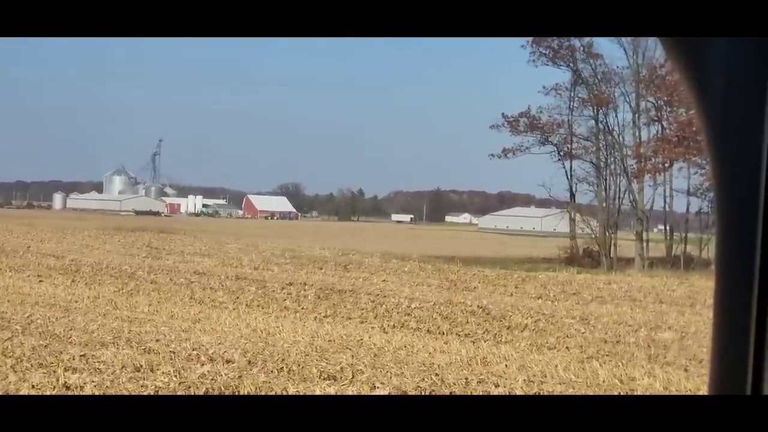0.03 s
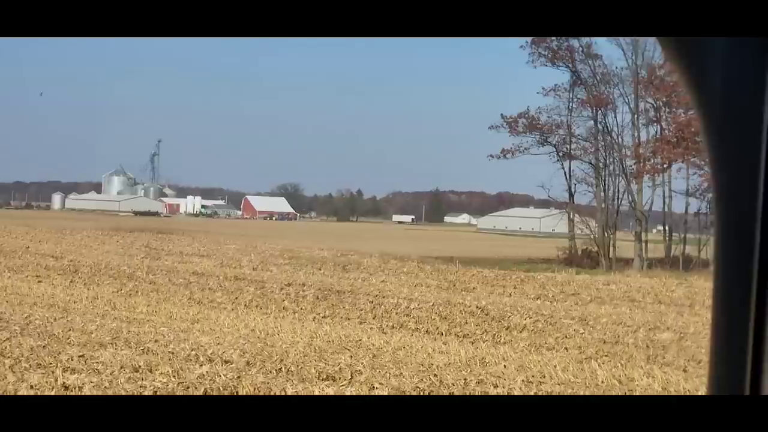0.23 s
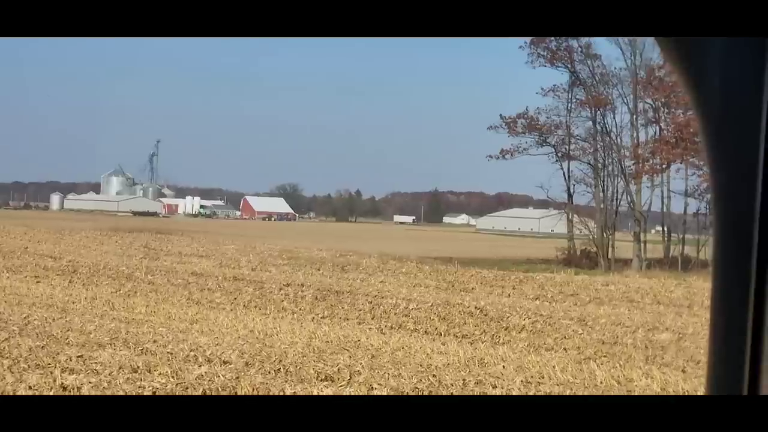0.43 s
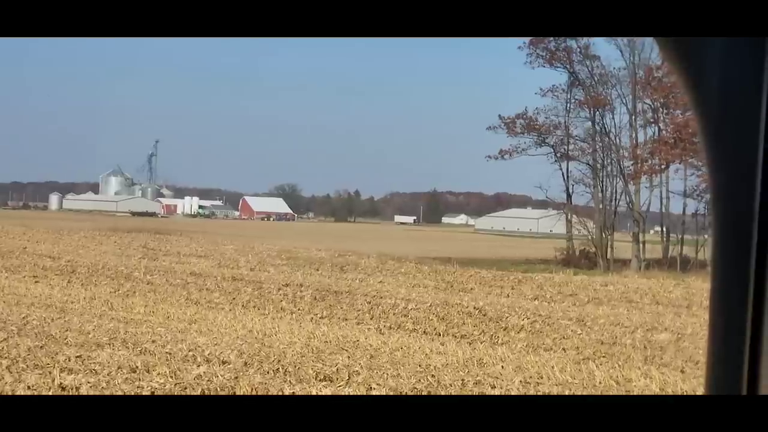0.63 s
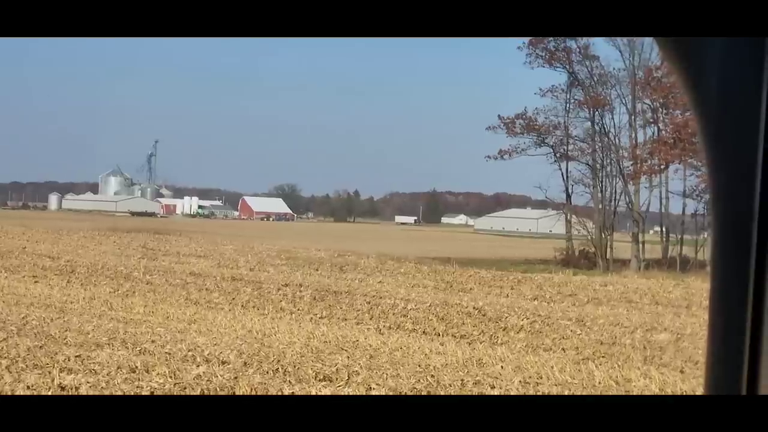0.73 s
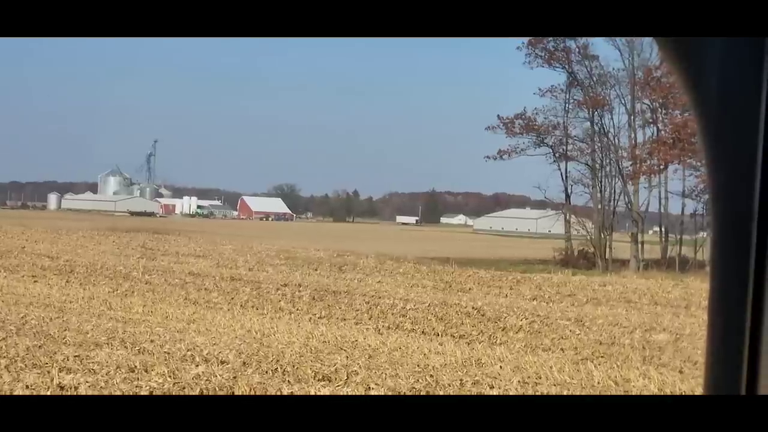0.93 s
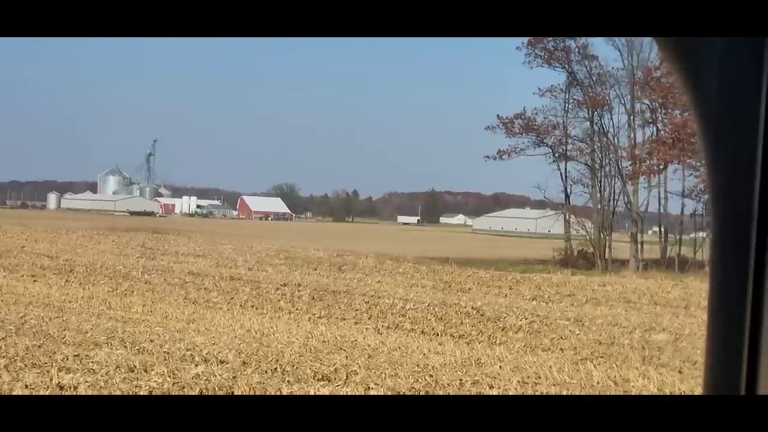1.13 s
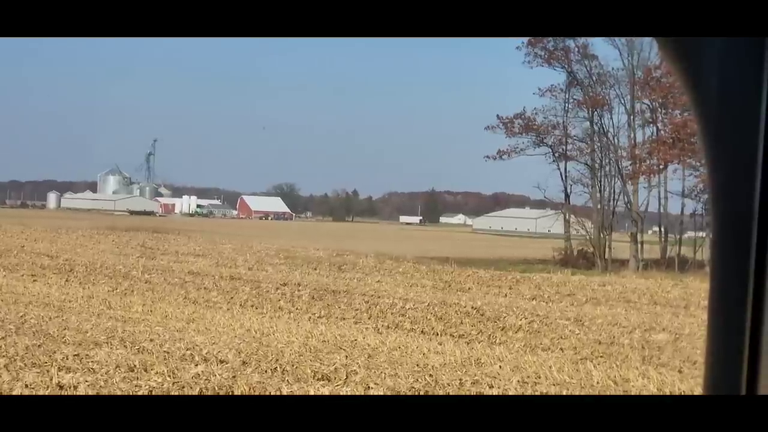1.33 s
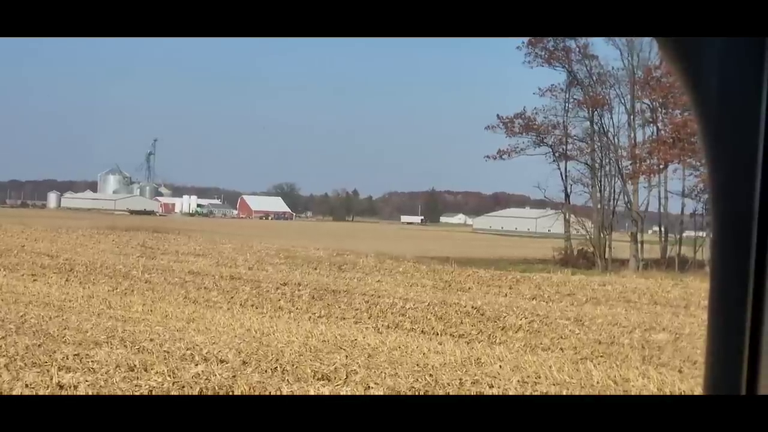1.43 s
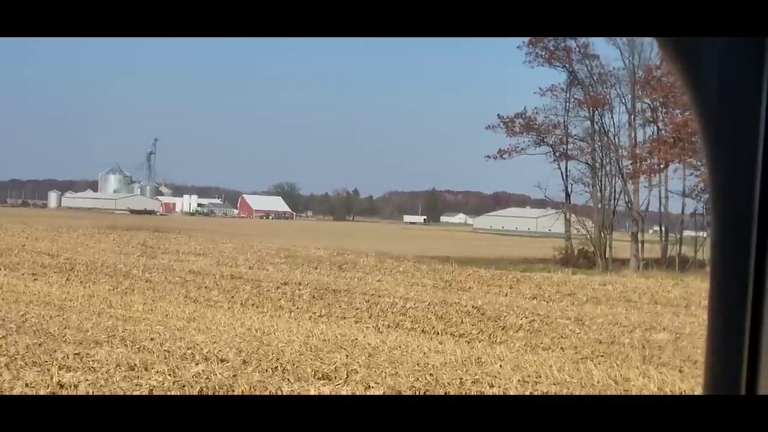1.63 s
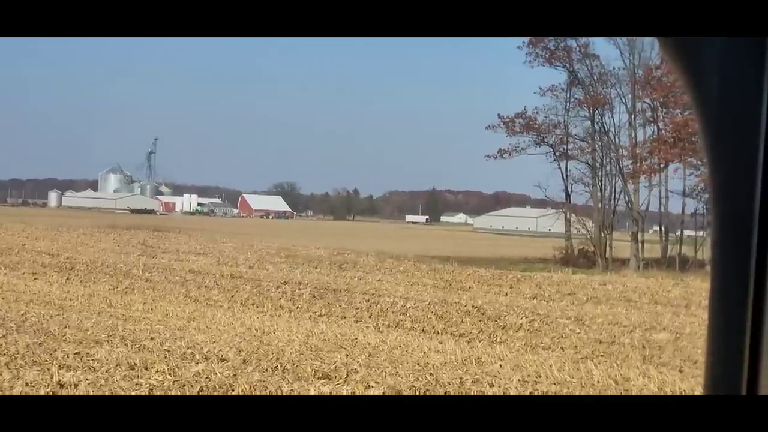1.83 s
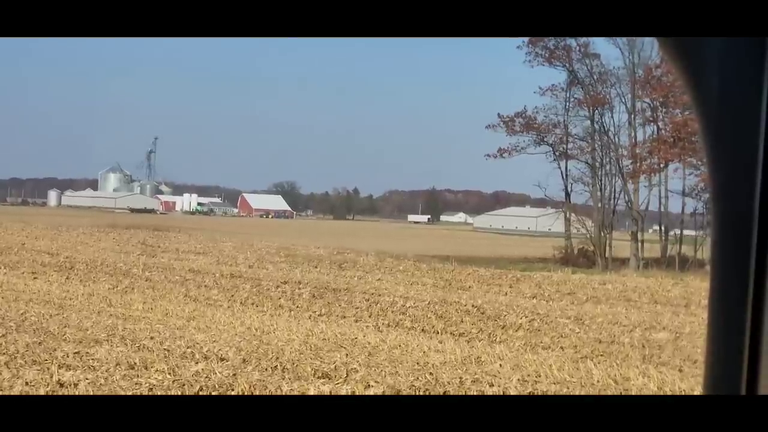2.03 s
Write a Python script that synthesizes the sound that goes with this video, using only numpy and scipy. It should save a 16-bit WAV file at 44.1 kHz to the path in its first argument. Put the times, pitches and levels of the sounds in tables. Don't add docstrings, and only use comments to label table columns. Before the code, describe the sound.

A harvester engine drones low and steady inside the cab, with a faint even hum above

```python
import sys
import numpy as np
from scipy import signal
from scipy.fft import rfft, irfft, next_fast_len
from scipy.io import wavfile
from scipy.ndimage import map_coordinates

SR = 44100
rng = np.random.default_rng(int(sys.argv[2]) if len(sys.argv) > 2 else 0)


def rack_gain(trim_db):
    fader = np.asarray(trim_db, float)
    return 10 ** (fader / 20)


def put_to_file(sound):
    columns = np.atleast_2d(sound).T
    safe = np.clip(columns, -1, 1)
    whole_steps = np.round(safe * 32767)
    wavfile.write(sys.argv[1], SR, whole_steps.astype(np.int16))


N = 91816
SIDES = np.array([[.5], [-.5]])


def unit(x):
    return x / np.sqrt(np.mean(x ** 2) + 1e-20)


def along(points, hz):
    f, v = np.transpose(points)
    return np.interp(np.log(hz + 1), np.log(f + 1), v)


def curves(rows):
    s, *cols = np.transpose(rows)
    return [np.interp(np.arange(N) / SR, s, c) for c in cols]


def wobble(rate_hz):
    knots = rng.standard_normal(int(N * 60 / SR) + 4)
    return map_coordinates(knots, [np.arange(N) * min(rate_hz, 60) / SR])


def filtered(x, response):
    m = next_fast_len(N + SR // 2)
    return irfft(rfft(x, m) * response(np.fft.rfftfreq(m, 1 / SR)), m)[..., :N]


def modes(rows):
    def response(f):
        total = 0
        for k, (hz, width_hz, db) in enumerate(rows):
            damping = 1j * f * width_hz
            total = total + (-1) ** k * rack_gain(db) * damping / (hz * hz - f * f + damping)
        return total
    return response


# frequency in Hz, correlation.
LIKENESS = [(40, 1.4), (100, 0.77), (200, 1.05), (330, 0.67), (650, 0.43), (1200, -0.41), (2000, 0.14),
            (5000, -0.04)]
# frequency in Hz, left over right in dB.
LEAN_DB = [(60, 0.0), (130, 0.5), (290, -0.5), (640, 0.5), (1390, 0.5), (3060, -3), (6720, 1),
           (14800, -8.5)]


def rush(gain):
    def mid_side(hz):
        turn = np.arccos(np.clip(along(LIKENESS, hz), -1, 1)) / 2
        return gain(hz) * [np.cos(turn), np.sin(turn)]

    mid, side = filtered(rng.standard_normal((2, N)), mid_side)
    stereo = np.array([mid + side, mid - side])
    return unit(filtered(stereo, lambda hz: rack_gain(SIDES * along(LEAN_DB, hz))))


def tone(hz, db, pan_db, lead_rad, drift, sway_db):
    turns = np.cumsum(hz * (1 + drift * wobble(3.01))) / SR + rng.random()
    level = rack_gain(db + sway_db * wobble(7.91) + pan_db * SIDES)
    return np.sqrt(2) * level * np.sin(2 * np.pi * turns + lead_rad * SIDES)


# start in seconds, boom level in dB.
CROP_LOAD = [(0.0, -37), (0.11, -44), (0.48, -27.5), (0.52, -42), (0.56, -33), (1.0, -36.5), (1.04, -53),
             (1.17, -27.5), (1.4, -43), (1.56, -31.5), (1.62, -46), (1.71, -36.5), (1.77, -43.5),
             (1.83, -28), (1.92, -44.5), (2.05, -30)]
# multiple of firing rate, level in dB.
ENGINE_ORDERS = [(.5, -45.5), (1, -42)]
# frequency in Hz, level in dB.
ROTOR_BEATS = [(78.9, -48), (82.8, -41.5), (97, -49), (114.5, -51)]
# frequency in Hz, width in Hz, level in dB.
CAB_MODES = [(44, 22, -6), (60, 18, -6.5), (85, 20, -3.5), (116, 32, -6), (163, 4, -16)]


def boom():
    firing_hz, in_step_s = 90.1, .455
    rumble_db, surge_share = -37, 0.74
    load_db, = curves(CROP_LOAD)
    t = np.arange(N) / SR - in_step_s
    lines = []
    for hz, db in [(k * firing_hz, db) for k, db in ENGINE_ORDERS] + list(ROTOR_BEATS):
        level = np.sqrt(2) * rack_gain(db + 2 * wobble(15))
        lines.append(level * np.cos(2 * np.pi * hz * t + .25 * wobble(3)))
    half_order, *throb = lines
    surge = rack_gain(surge_share * (load_db - load_db.mean()))

    def cab(f):
        power = sum(abs(modes([row])(f)) ** 2 for row in CAB_MODES)
        return np.sqrt(power) / (1 + (f / 200) ** 2)

    return half_order + surge * sum(throb) + rack_gain(rumble_db) * rush(cab)


# frequency in Hz, density in dB per Hz.
FLOOR_ROAR = [(76, -19), (130, -2), (184, -3.5), (280, -3), (382, -9.5), (449, -10.5), (559, -8.5),
              (625, -16.5), (700, -18), (910, -52.5), (1540, -120)]
# frequency in Hz, density in dB per Hz.
GLASS_ROAR = [(410, -37), (700, -5.5), (1050, -9), (1140, -5), (1230, -12), (2220, -15), (3270, -23),
              (7470, -37.5), (10500, -53.5), (13600, -102), (22000, -120)]
# frequency in Hz, width in Hz, dB over the roar.
PANEL_RINGS = [(209, 17, 2), (267, 11, 4.5), (297.7, 6.9, 3), (310, 6, 5), (350, 6.7, 2.5),
               (540.5, 15, 0.5), (670, 22, 0), (780, 14, 0.5), (974, 4.7, 4.5), (1294, 38, 7.5),
               (1683, 14, 4), (2037, 28, 4.5), (2140, 22, 4), (4130, 350, 3)]


def roar():
    def panels(f):
        return rack_gain(sum(db / (1 + (2 * (f - hz) / width_hz) ** 2) for hz, width_hz, db in PANEL_RINGS))

    low_level = rack_gain(-40 + 1.0 * wobble(4.77))
    high_level = rack_gain(-46 + .4 * wobble(4) + .5 * wobble(12))
    low = low_level * rush(lambda f: rack_gain(along(FLOOR_ROAR, f)) * panels(f))
    high = high_level * rush(lambda f: rack_gain(along(GLASS_ROAR, f)) * panels(f))
    return low + high


# multiple of pump rate, level in dB, left over right in dB, left lead in rad.
PUMP_ORDERS = [(1, -53.5, 5, -.2), (2, -56, 4, -.3), (3, -64, -3, -1.7)]


def pump():
    pump_hz = 570.1
    return sum(tone(k * pump_hz, db, pan_db, lead_rad, drift=.0004, sway_db=2.3)
               for k, db, pan_db, lead_rad in PUMP_ORDERS)


# frequency in Hz, level in dB, left over right in dB, left lead in rad.
GEAR_LINES = [(414.6, -60, 0, 1), (483.4, -56, -1, -.3), (517.6, -58, 5, 1.2), (562.8, -59, 8, .5),
              (724.9, -62, 6, -2.1), (836.5, -63, 6, -.1), (1087.4, -68, -7, 2.4), (1152, -58, 3, -2.3),
              (1170.2, -65, 2, -2.6), (1449.9, -68, 2, -3), (1812.5, -71, 2, -.8), (2159.8, -70, -1, -.3),
              (2295.5, -70, -12, 1.3), (2340.6, -70, 3, -2.5), (5797.5, -91, 3, .2)]


def gears():
    return sum(tone(*row, drift=.0005, sway_db=1.5) for row in GEAR_LINES)


# time in seconds, pitch in Hz, level in dB.
WHISTLE_PATH = [(0, 4712, -75), (.08, 4720, -71), (.2, 4706, -79), (.36, 4710, -79), (.4, 4712, -74),
                (.65, 4721, -70.5), (.85, 4715, -73.5), (1.1, 4715, -70), (1.13, 4700, -78),
                (1.58, 4718, -78), (1.62, 4722, -73), (2.08, 4727, -70)]


def whistle():
    hz, db = curves(WHISTLE_PATH)
    return tone(hz, db, pan_db=-6.5, lead_rad=-.6, drift=.0003, sway_db=1.2)


# time in seconds, level in dB.
LEAK_GUSTS = [(0.0, -73.5), (0.2, -67), (0.22, -76), (0.29, -64), (0.39, -71), (0.68, -63.5), (0.98, -82.5),
              (1.05, -65), (1.08, -68), (1.19, -59.5), (1.2, -67), (1.45, -68.5), (1.49, -80), (1.63, -64),
              (1.8, -77), (1.82, -63.5), (2.0, -80), (2.08, -64)]
# frequency in Hz, width in Hz, level in dB.
NOZZLE_MODES = [(11420, 90, -9), (11725, 40, 0), (11805, 40, -1), (11890, 50, -6), (12120, 55, 0),
                (12260, 50, -7), (12415, 55, -5)]


def leak():
    pan_db, shared, lag_s = -6, 0.66, 0.00041
    level_db, = curves(LEAK_GUSTS)
    spitting = rack_gain(3 * wobble(55) + 2.5 * wobble(20))
    own, near = rng.standard_normal((2, N)) * spitting
    late = filtered(near, lambda f: -np.exp(2j * np.pi * (f - 11500) * lag_s))
    spit = np.array([shared * late + np.sqrt(1 - shared ** 2) * own, near])
    ring = unit(filtered(spit, lambda f: modes(NOZZLE_MODES)(f) / (1 + ((f - 11900) / 900) ** 6)))
    return rack_gain(level_db + pan_db * SIDES) * ring


# frequency in Hz, density in dB per Hz.
VENT_HISS = [(10200, -30), (11000, -16), (11400, -4), (12300, 0), (13000, -7), (13600, -13), (15000, -9),
             (15400, -11)]


def vent():
    level_db = -72
    return rack_gain(level_db) * unit(filtered(rng.standard_normal((2, N)), lambda f: rack_gain(along(VENT_HISS, f))))


def scene():
    return boom() + roar() + pump() + gears() + whistle() + leak() + vent()


def roll_off(x):
    return signal.sosfilt(signal.butter(12, 15360, fs=SR, output="sos"), x)


def record(dry):
    cut_hz = 9.1
    mix = filtered(dry, lambda f: (1j * f / (cut_hz + 1j * f)) ** 2)
    return roll_off(mix)


dry = scene()
out = record(dry)
put_to_file(out)
```